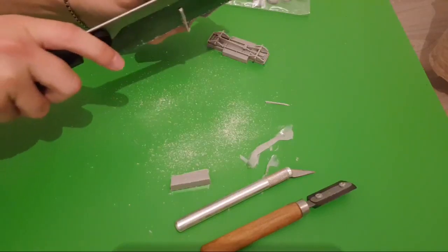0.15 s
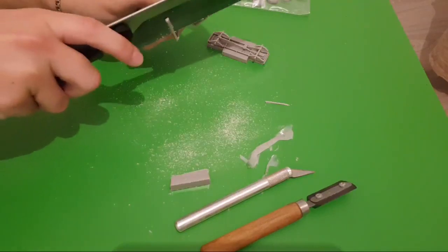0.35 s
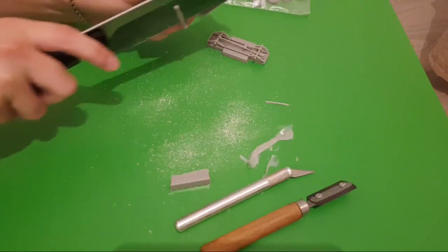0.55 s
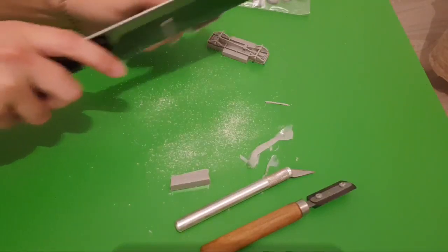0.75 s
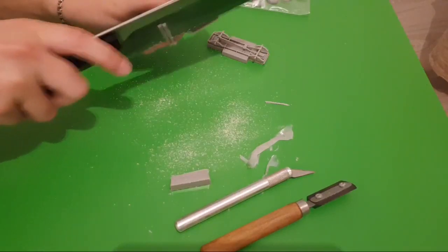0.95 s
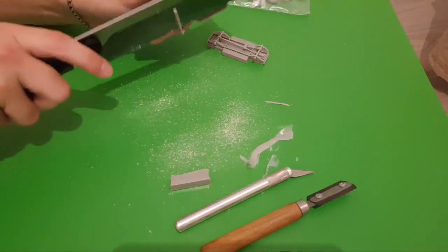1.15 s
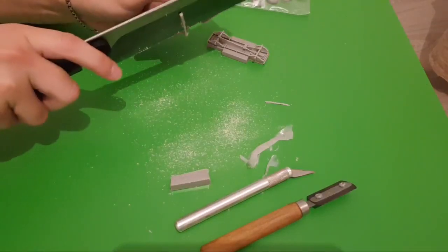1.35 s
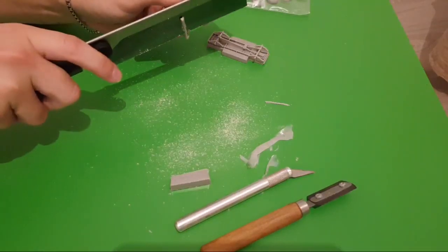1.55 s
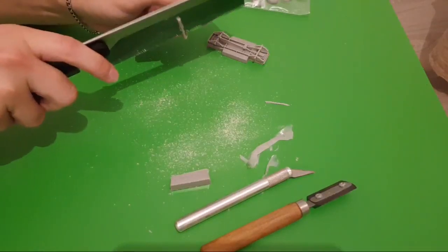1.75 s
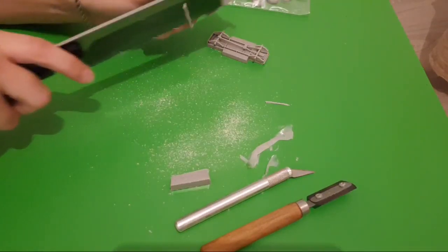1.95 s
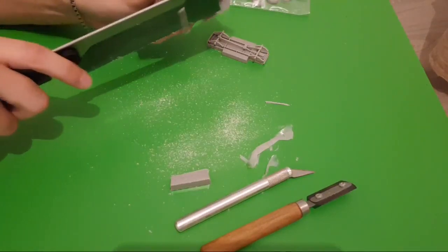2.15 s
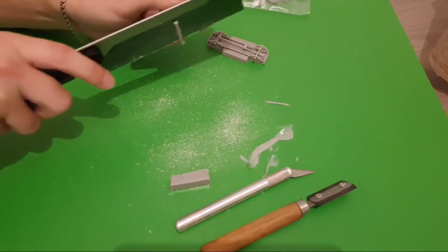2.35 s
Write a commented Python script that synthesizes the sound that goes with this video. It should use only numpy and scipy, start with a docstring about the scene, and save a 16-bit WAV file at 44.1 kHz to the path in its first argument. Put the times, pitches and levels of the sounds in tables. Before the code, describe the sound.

A fine razor saw cuts a small resin piece with four quick, raspy strokes, pauses, then makes two softer ones with sharp clicks; close microphone in a bare, quiet room with a short reverberant tail.

```python
"""A fine razor saw cuts a small cast resin part at a hobby desk: four quick strokes, a pause, two more.
The teeth catch unevenly, and these impulses excite damped resonances of the thin blade and the part.
Resin crumbles as a hiss of filtered random clicks, and now and then a tooth snags hard.
The blade is re-seated in the pause and its resonances change balance.
Slowly swelling low modes make the desk boom faintly; a bare room adds a diffuse tail over a noise floor."""
import sys
import numpy as np
from scipy import signal
from scipy.fft import rfft, irfft
from scipy.io import wavfile

SR = 44100
rng = np.random.default_rng(int(sys.argv[2]) if len(sys.argv) > 2 else 0)


def store_wav(level_fs):
    """Save 16-bit WAV to argv[1]."""
    pcm = np.round(np.clip(np.atleast_2d(level_fs), -1, 1) * 32767)
    wavfile.write(sys.argv[1], SR, pcm.T.astype(np.int16))


N = 110250
LEAD_S = .25  # computed before the output begins, so that earlier sounds are already under way
TIME = np.arange(-int(LEAD_S * SR), N) / SR
SIZE = len(TIME)
GRAINS_PER_S, GRAIN_SPREAD_DB = 12000, 3.5  # resin crumbs and fine grit


def from_db(db):
    """Level law: 20 dB is a factor of ten in amplitude."""
    return 10 ** (np.asarray(db) / 20)


def rms_one(x):
    """Normalisation to unit mean power."""
    return x / np.sqrt(np.mean(x ** 2) + 1e-20)


def at_hz(points, hz, axis=1):
    """Log-frequency interpolation of one table column."""
    points = np.array(points)
    return np.interp(np.log(np.maximum(hz, 1)), np.log(points[:, 0]), points[:, axis])


def through(x, response):
    """Linear filtering: convolution with an impulse response."""
    return signal.fftconvolve(x, response)[:SIZE]


def high_pass(x, hz):
    """Second-order Butterworth filtering of the lows."""
    return signal.sosfilt(signal.butter(2, hz, "high", fs=SR, output="sos"), x)


def decay(t, t60):
    """Exponential damping: the level falls 60 dB in t60 seconds."""
    return np.exp(-np.log(1000) * t / t60)


def add(track, s, sound):
    """Superposition: lays a sound into a track at the given time."""
    at = max(int((s + LEAD_S) * SR), 0)
    track[..., at:at + sound.shape[-1]] += sound


def colour(points, size=4096):
    """Minimum phase: a folded cepstrum gives a causal response of unit energy with the given spectrum."""
    magnitude = from_db(at_hz(points, np.fft.rfftfreq(size, 1 / SR)))
    cepstrum = irfft(np.log(magnitude))
    cepstrum[1:size // 2] *= 2
    cepstrum[size // 2 + 1:] = 0
    response = irfft(np.exp(rfft(cepstrum)))
    return response / np.linalg.norm(response)


def grains(per_s, spread_db):
    """Shot noise: random clicks of uneven size and either sign; rms 1."""
    present = rng.random(SIZE) < per_s / SR
    sign = rng.choice([-1, 1], SIZE)
    size = from_db(spread_db * np.clip(rng.standard_normal(SIZE), -2, 2))
    return rms_one(present * sign * size)


# Spectrum of the background. Each row: frequency in Hz, relative density in dB per Hz.
BACKGROUND = [(25, -28), (65, 1.5), (130, 1.5), (250, -13), (1000, -20), (4000, -23.5), (10000, -21),
              (16000, -18)]
BACKGROUND_DB = -75


def background():
    """Stationary noise: white noise shaped by a fixed spectrum."""
    return from_db(BACKGROUND_DB) * through(rng.standard_normal(SIZE), colour(BACKGROUND))


# Low modes of desk and room. Each row: frequency in Hz, swell time in seconds, t60 in seconds.
DESK_MODES = [(66.4, .2, .42), (127, .05, .55), (163, .04, .28), (195, .03, .8)]
# Jolts of the desk by the strokes. Each row: time in seconds, then the drive of each mode in dB,
# lowest mode first.
DESK_JOLTS = [(-0.03, -54, -58, -60, -44.5), (0.205, -52, -51, -40, -70), (0.51, -38, -51, -52, -63),
              (0.76, -52, -42, -37, -60), (1.02, -34, -50, -52, -60), (1.87, -36, -60, -59, -66),
              (2.2, -48, -50, -62, -56)]


def desk():
    """Modal superposition: after each jolt the low modes swell and die away."""
    t = np.arange(SR) / SR
    out = np.zeros(SIZE + SR)
    modes = np.array([decay(t, t60) * np.tanh(t / swell) ** 2 * np.sin(2 * np.pi * hz * t)
                      for hz, swell, t60 in DESK_MODES])
    for s, *levels_db in DESK_JOLTS:
        add(out, s, from_db(levels_db) @ modes)
    return out[:SIZE]


# Room tail. Each row: frequency in Hz, band level in dB, t60 in seconds.
ROOM_TAIL = [(125, -5, .9), (300, -6, .55), (600, -7, .46), (1400, -3.5, .64), (2410, -7.5, .63),
             (4500, -5.3, .56), (7500, -6.5, .52), (10000, -8, .47), (15030, -9.5, .43)]
ROOM_DELAY_S, ROOM_BUILD_S = .005, .005


def room(x):
    """Diffuse reverberation: a noise tail builds up quickly and dies band by band."""
    t = np.arange(SR) / SR
    tail = np.zeros(SR)
    build = np.clip((t - ROOM_DELAY_S) / ROOM_BUILD_S, 0, 1)
    edges = np.geomspace(60, 17000, 15)
    white = rng.standard_normal((2, SR))  # neighbouring bands take different noise
    for k, (low, high) in enumerate(zip(edges, edges[1:])):
        hz = np.sqrt(low * high)
        shape = build * decay(t, at_hz(ROOM_TAIL, hz, axis=2))
        band_pass = signal.butter(2, [low, high], "band", fs=SR, output="sos")
        band = signal.sosfilt(band_pass, white[k % 2])
        tail += from_db(at_hz(ROOM_TAIL, hz)) * band * shape / np.linalg.norm(shape)
    return through(x, tail)


# Spectrum of crumbling resin. Each row: frequency in Hz, relative density in dB per Hz.
CRUMB_SPECTRUM = [(45, -32), (105, -1), (180, -2), (260, -8), (400, -3), (540, 1), (850, -3), (1250, 4.5),
                  (1900, 9), (3600, 4), (5000, 3.5), (7000, 1), (8700, -1), (9700, 3.5), (12000, 1.5),
                  (16000, -2.5)]


def crumbling(drive, cracks):
    """Fracture noise: resin breaks away in a dense spray of tiny cracks, with a larger one at each snag."""
    spray = drive * grains(GRAINS_PER_S, GRAIN_SPREAD_DB)
    return through(spray + cracks, colour(CRUMB_SPECTRUM))


# A tooth snags and breaks free. Each row: time in seconds, knock on the blade in dB
# (before its share among the registers), crack in dB.
TOOTH_SNAGS = [(0.205, -17, -30), (0.2103, -8, -24), (0.254, -22, -30), (0.461, -18, -30),
               (0.483, -14, -28), (0.5065, -7, -22), (0.5235, -7, -22), (0.5305, -8, -16),
               (0.5525, -6, -28), (0.564, -25, -24), (0.760, -14.5, -26), (0.786, -9, -28),
               (0.8065, -22, -28), (0.9845, -12, -30), (1.0262, -13, -28), (1.052, -8.5, -24),
               (1.0665, -13, -24), (1.2075, -27, -38), (1.8906, -13, -13), (1.8999, -13, -30),
               (1.9025, -5, -12), (1.9155, -6, -7.5), (1.9628, -13.5, -26), (1.984, -11, -26),
               (2.1762, -17, -32), (2.2397, -20, -17), (2.2831, -18, -32)]


def snags():
    """Impulse excitation: single hard clicks, as knocks on the blade and as cracks."""
    out = np.zeros((2, SIZE))
    for s, *levels_db in TOOTH_SNAGS:
        out[:, int((s + LEAD_S) * SR)] += from_db(levels_db)
    return out


# Runs of the blade through the cut. Each row: start in seconds, rise in seconds, hold in seconds,
# fade by 20 dB in seconds, then drive in dB of the low, middle and high registers and of the crumbling.
BLADE_RUNS = [(-0.12, 0.0097, 0.074, 0.0041, -25, -31, -45, -34),
              (0.207, 0.0014, .046, .07, -20.5, -25, -37, -32.5),
              (0.4605, 0.00089, .008, 0.0342, -31, -32, -46, -42),
              (0.4805, .002, 0.013, .022, -20.5, -24, -33.5, -31.5),
              (0.501, .003, 0.035, .078, -17.5, -19.5, -29.5, -28.5),
              (0.755, .006, .006, 0.06, -25, -29, -39, -37.5),
              (0.784, 0.0022, .022, .1, -19.5, -30.5, -40, -35),
              (0.937, .007, 0.0086, .010, -28, -25, -42, -38),
              (0.982, .004, .011, .035, -23, -27.5, -36, -32),
              (1.025, 0.0018, .011, .010, -20, -24.5, -36, -34),
              (1.045, 0.0016, 0.032, 0.0769, -20.5, -25, -33.5, -30),
              (1.194, .010, 0.012, 0.0324, -35, -40, -50, -46),
              (1.836, .001, .003, 0.13, -47, -48, -51.5, -56),
              (1.846, .003, .007, .012, -29, -35, -35, -42), (1.862, .003, .022, .01, -36, -45, -49, -45),
              (1.89, 0.028, .060, .065, -30.5, -27, -35.5, -36),
              (2.172, 0.034, .032, .07, -30, -33, -43, -38.5),
              (2.255, .015, .022, .10, -32.5, -41, -54, -41)]


def pressure():
    """Energy addition: each run rises, holds and fades, and overlapping runs sum in power."""
    power = np.zeros((4, SIZE + SR))
    t = np.arange(SR // 2) / SR
    for start, rise, hold, fade, *levels_db in BLADE_RUNS:
        attack = np.clip(t / max(rise, 1 / SR), 0, 1)
        release = from_db(-20 * np.clip((t - rise - hold) / fade, 0, 10))
        add(power, start, np.outer(from_db(levels_db), attack * release) ** 2)
    return np.sqrt(power[:, :SIZE])


CATCHES_PER_S, CATCH_JITTER, CATCH_SPREAD_DB = 320, .36, 2.6  # nominal rate; jitter of the log interval
CHATTER_PER_S, CHATTER_DB = 2500, -8.5  # small slips between the catches


def catches(count=2000):
    """Stick-slip: the teeth catch in a loosely regular train, with small slips in between; rms near 1."""
    chance = np.clip(rng.standard_normal((count, 2)), -2, 2)
    intervals = np.exp(CATCH_JITTER * chance[:, 0]) * SR / CATCHES_PER_S
    at = np.cumsum(intervals).astype(int)
    train = np.bincount(at, from_db(CATCH_SPREAD_DB * chance[:, 1]), SIZE)[:SIZE]
    return rms_one(train) + from_db(CHATTER_DB) * grains(CHATTER_PER_S, GRAIN_SPREAD_DB)


# Lingering modes of the steel. Each row: frequency in Hz, relative level in dB, t60 in seconds.
STEEL_MODES = [(2082, -48, .6), (2202, -41, .35), (2332, -41, 0.3), (2443, -42, .5), (3402, -50, 0.26),
               (3540, -46, .4), (4160, -46, 0.3)]
STEEL_DB = -8  # common gain of these modes


def steel(force):
    """Modal ringing: lightly damped sines of the steel outlast each catch."""
    t = np.arange(SR) / SR
    response = sum(from_db(db) * decay(t, t60) * np.sin(2 * np.pi * hz * t) for hz, db, t60 in STEEL_MODES)
    return from_db(STEEL_DB) * through(force, response)


# Damped resonances of blade and part. Each row: frequency in Hz, bandwidth in Hz,
# relative level in dB before the pause, relative level in dB after it.
BLADE_MODES = [(2160, 190, 0, -2), (2380, 280, 0.5, 0), (2810, 400, 0, 0), (3471, 400, -4.5, -2.5),
               (4130, 340, -9.5, -19), (5200, 1300, -2, -9), (6950, 480, -1, 0), (8200, 450, -5, -10),
               (9600, 480, 0, -6), (11000, 1000, -7, -13)]
REGISTER_EDGES_HZ = (2620, 4900)  # divide the modes into low, middle and high
BLADE_LOW_CUT_HZ, CONTACT_S = 1200, .0002


def blade_response(register, seat):
    """Damped resonance: one register of the blade, struck through a slightly soft contact."""
    t = np.arange(SR // 20) / SR
    modes = np.zeros(len(t))
    for k, (hz, width, *db) in enumerate(BLADE_MODES):
        if np.searchsorted(REGISTER_EDGES_HZ, hz) == register:
            ring = np.exp(-np.pi * width * t) * np.sin(2 * np.pi * hz * t)
            # the factor width sets the resonance peak by db alone; signs alternate from mode to mode
            modes += (-1) ** k * from_db(db[seat]) * width * ring
    return high_pass(modes * (1 - np.exp(-t / CONTACT_S)), BLADE_LOW_CUT_HZ)


# Gain of snag clicks, in dB, in the low, middle and high registers.
SNAG_GAIN_DB = (-4, -4, -1)
RESEAT_S = 1.7


def blade(low, middle, high, knocks, cracks):
    """Source and resonator: catches ring the low and middle registers, fine grit and cracks the high one."""
    teeth = catches()
    grit = grains(GRAINS_PER_S, GRAIN_SPREAD_DB)
    registers = [(low * teeth, knocks), (middle * teeth, knocks), (high * grit, cracks)]
    out = steel(low * teeth)
    # the balance of the modes depends on how the blade sits in the cut
    for seat, active in enumerate((TIME < RESEAT_S, TIME >= RESEAT_S)):
        for register, (rasp, clicks) in enumerate(registers):
            response = blade_response(register, seat)
            # rasp is scaled by the energy of the response, single clicks by its peak
            rasp_force = rasp / np.linalg.norm(response)
            click_force = from_db(SNAG_GAIN_DB[register]) * clicks / abs(response).max()
            out = out + through(active * (rasp_force + click_force), response)
    return out


def scene():
    """Superposition: the saw and its room tail, the desk and the background."""
    low, middle, high, crumbs = pressure()
    knocks, cracks = snags()
    saw = blade(low, middle, high, knocks, cracks) + crumbling(crumbs, cracks)
    return (saw + room(saw) + desk() + background())[None, -N:]


def record(dry):
    """Band limiting: a steep elliptic low-pass removes the top above 15.9 kHz."""
    low_pass = signal.ellip(10, .1, 80, 15900, fs=SR, output="sos")  # order, ripple dB, rejection dB, Hz
    return signal.sosfilt(low_pass, dry)


dry = scene()
out = record(dry)
store_wav(out)
```